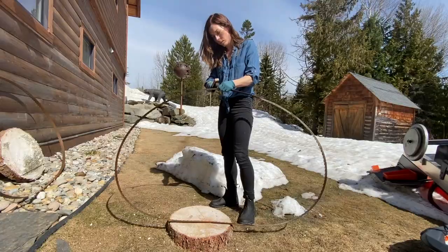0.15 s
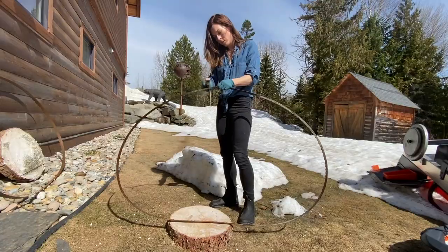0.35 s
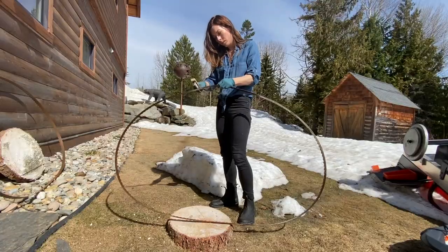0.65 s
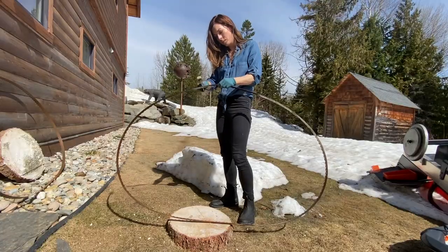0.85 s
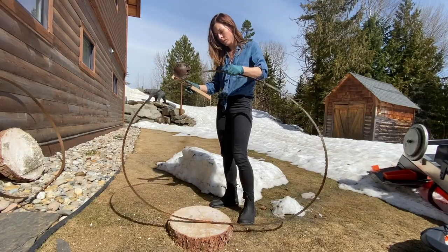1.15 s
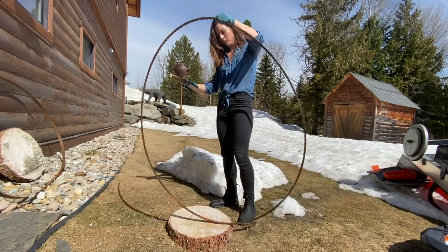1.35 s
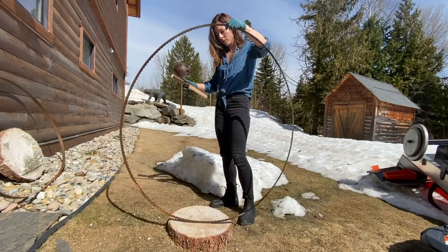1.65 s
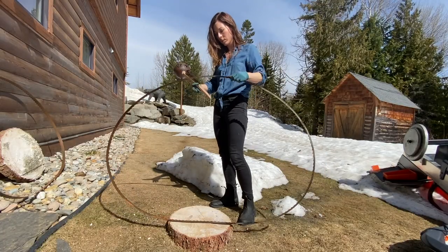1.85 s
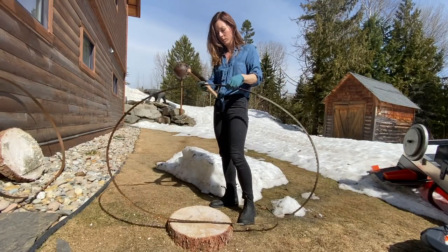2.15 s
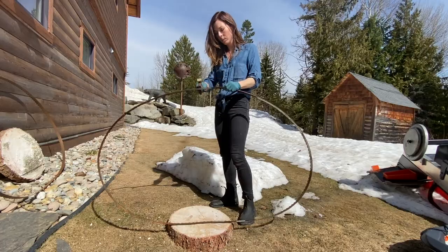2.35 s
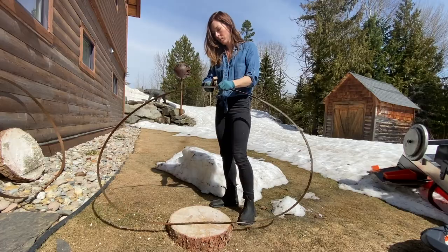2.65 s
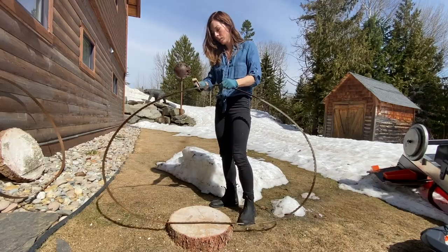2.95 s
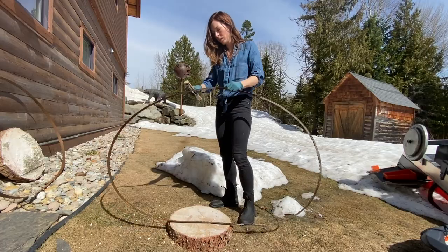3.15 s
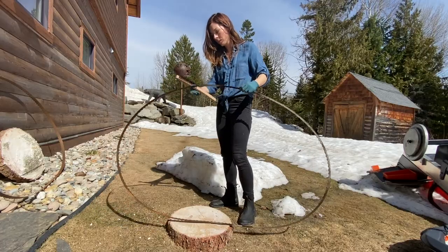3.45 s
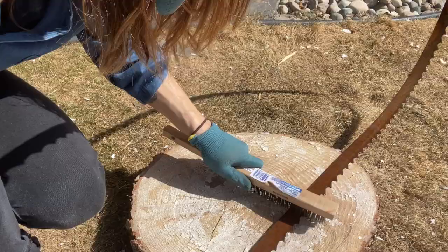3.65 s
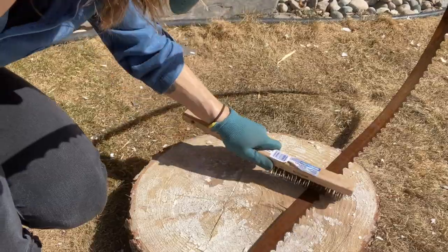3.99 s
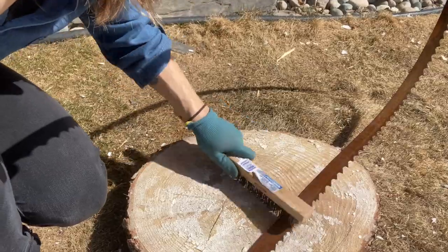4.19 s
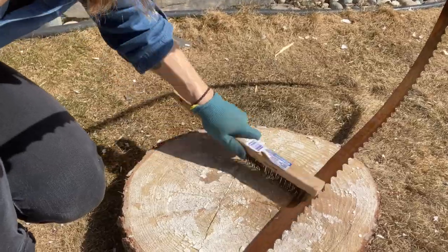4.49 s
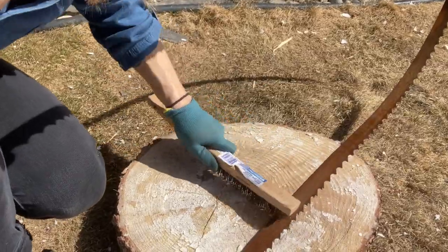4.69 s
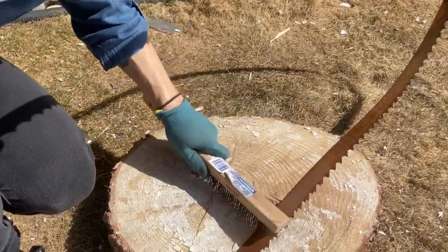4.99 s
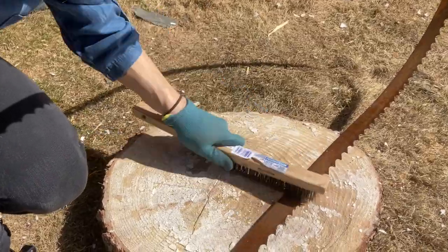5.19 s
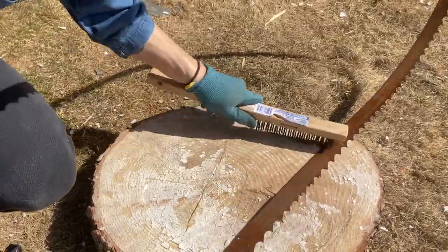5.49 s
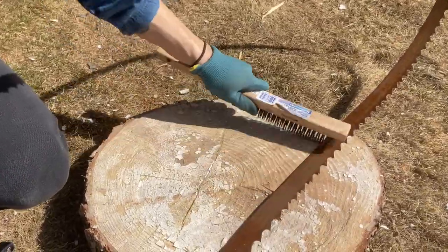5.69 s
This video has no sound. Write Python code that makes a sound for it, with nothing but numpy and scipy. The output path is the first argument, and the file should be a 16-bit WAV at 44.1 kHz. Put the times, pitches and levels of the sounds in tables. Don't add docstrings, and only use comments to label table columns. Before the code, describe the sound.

Outdoors, a wire brush rasps twice along a ringing steel saw band far off, then scrubs rapidly up close over a wooden stump.

```python
import sys
import numpy as np
from scipy import signal
from scipy.fft import rfft, irfft, next_fast_len
from scipy.io import wavfile
from scipy.ndimage import uniform_filter1d

SR = 44100
rng = np.random.default_rng(int(sys.argv[2]) if len(sys.argv) > 2 else 0)


def int16_out(signal):
    q = np.round(np.clip(np.atleast_2d(signal).T, -1, 1) * 32767)
    wavfile.write(sys.argv[1], SR, q.astype(np.int16))


def to_linear_factor(level_db):
    exponent = np.asarray(level_db, float) / 20
    return 10 ** exponent


N = 257103
SIZE = next_fast_len(N + SR)
HZ = np.fft.rfftfreq(SIZE, 1 / SR)
T = np.arange(N) / SR

# start in seconds, peak in dB, low ping in dB.
TOOTH_CATCHES = [(0.084, -41, -86), (0.1534, -52, -64), (0.168, -39.5, -59), (0.193, -42, -58.5),
                 (0.227, -54, -66), (0.248, -56, -81), (.278, -39.5, -70), (0.3034, -43, -66),
                 (0.333, -43, -75), (0.384, -38, -65), (0.41, -39, -68), (0.4614, -39.5, -81),
                 (0.491, -35.5, -55.5), (0.514, -37, -83), (0.547, -33, -67), (0.5965, -28.5, -51),
                 (0.63, -34, -55.5), (0.6545, -31.5, -52), (0.714, -37, -51), (0.741, -33.5, -58),
                 (0.7707, -32.5, -61), (0.7944, -46, -72), (0.826, -34.5, -53.5), (0.858, -32.5, -56),
                 (0.883, -30.5, -53.5), (0.913, -40.5, -58), (0.944, -36, -57), (0.971, -47, -59),
                 (1.01, -32.5, -64), (2.3797, -37.5, -60), (2.391, -38, -59), (2.4505, -38, -54),
                 (2.4764, -43, -64), (2.5025, -34, -47.5), (2.527, -56, -53.5), (2.586, -34.5, -74.5),
                 (2.6163, -38, -57), (2.66, -31, -57), (2.693, -33.5, -76), (2.72, -40, -73),
                 (2.771, -30, -50.5), (2.804, -36.5, -57), (2.836, -55, -72), (2.866, -40, -67),
                 (2.8885, -33, -51), (2.9436, -32, -50), (2.996, -27.5, -55), (3.0594, -53, -83),
                 (3.079, -37, -70), (3.1073, -30, -51), (3.129, -38, -57), (3.15, -49, -67)]
# peak in dB, t60 in seconds, rise in seconds, low ping in dB.
SLAP = (-24, -0.1, 0.5, -50.5)
# frequency in Hz, level in dB, t60 in seconds.
BAND_MODES = [(535, -6.5, 0.021), (965, 5, 0.056), (1023, -1, 0.018), (2472, -3, 0.086), (2864, 3, 0.061),
              (2910, -2, 0.025), (3790, -4, 0.05), (4650, 3, 0.036), (4510, -15, 0.046), (4500, -11, 0.054),
              (6070, 0, 0.036), (6460, 7, 0.038), (6595, 4.5, 0.027), (8600, 3, 0.3), (8880, 10.5, 0.072),
              (9300, -21, 0.26), (10600, -29, 0.2), (11560, 13, 0.056), (11170, 0.5, 0.067),
              (11400, -7.5, 0.26), (14000, -9, .05), (14400, -10, 0.081), (15800, -2, 0.055),
              (15700, -2, 0.11), (15800, -13, 0.11), (16000, 4, 0.17)]
# frequency in Hz, level in dB.
RUST_COLOUR = [(250, -77), (500, 2), (1500, -5), (2600, 1.5), (5000, 4.5), (7200, 1.5), (9300, 6),
               (11000, -1), (11700, 1), (12300, -30), (12800, 5), (14900, 2), (15150, 14.5), (15800, 4.5)]
# frequency in Hz, likeness 0-1, phase in radians, left over right in dB.
FAR_PORTS = [(300, 0.32, 0, -2.5), (1080, 0.99, -1.36, 4.5), (3860, 0.85, -1.5, 0), (6200, 0.48, -2, -1),
             (7440, 0, -4, 2), (8700, 1, -5, 2.5), (11400, 0.2, -4.5, 5), (12800, 0.7, -0.5, 1),
             (15700, 0, -16, 1)]
SLAP_S = 2.3272
TOOTH_T60, TOOTH_RISE_S = 0.07, 0.0085
GRIT_RING_DB, TOOTH_RING_DB = 2.5, 6.0
TICK_DB = -9
SPOT_DB, SPOT_SPREAD = (5, 2), .008
HELD_DB = (-4, 1)


def free_band():
    press, grip = drag_shape()
    press = press * to_linear_factor(2.0 * wander(220))
    grit = patchy(slips(20000, 2.9), 2.7)
    scrape = yard((grit + to_linear_factor(TICK_DB) * slips(500, 3.6)) * press, 0.16, -6.5)

    hits = [(s, db, TOOTH_T60, TOOTH_RISE_S, ping) for s, db, ping in TOOTH_CATCHES]
    s, peak_db, t60, rise, ping_db = np.transpose(hits + [(SLAP_S, *SLAP)])
    knock = patchy(slips(9000, 2.65), 2.5)
    catches = yard(knock * jolts(s, peak_db - 1.0, t60, rise), 0.3, -10.0)
    pings = knock * jolts(s, ping_db + 9, 0.082, 0.01)

    rust = to_linear_factor(read(RUST_COLOUR))
    low = 1 / (1 + (HZ / 1600) ** 4)
    tilt = to_linear_factor(2.33 * np.log2(np.clip(HZ, 2000, None) / 8000))
    out = 0
    spot = np.searchsorted(np.sort(s), T) % 2 + 2 * (T > 2)
    for k, (gain, tune) in enumerate(rng.standard_normal((4, 2, len(BAND_MODES)))):
        drag = k // 2
        gain = np.clip(gain, -1.5, 1)
        rings = modes([(hz * (1 + SPOT_SPREAD * b), db + HELD_DB[drag] + SPOT_DB[drag] * a, ring)
                       for (hz, db, ring), a, b in zip(BAND_MODES, gain, tune)])
        gritty = unit(rust + to_linear_factor(GRIT_RING_DB) * rings) * (1 - low) * tilt
        struck = unit(rust + to_linear_factor(TOOTH_RING_DB) * rings) * (1 - low) / tilt
        out = out + ports(scrape * (spot == k), gritty, FAR_PORTS)
        out = out + ports(catches * (spot == k), struck, FAR_PORTS)

    out = out + ports(pings, unit(modes(BAND_MODES) * low) * to_linear_factor(-5.5), FAR_PORTS)
    body = unit(rust + to_linear_factor(GRIT_RING_DB) * modes(BAND_MODES)) * .5 + unit(rust) * .5
    return out + ports(scrape * grip, body * low * HZ ** 2 / (HZ ** 2 + 250 ** 2), FAR_PORTS)


# start in seconds, end in seconds, scrape in dB,
# grip at the start in dB, grip at the end in dB.
DRAGS = [
    (0.077, 1.041, -48.5, -14, 1.5),
    (2.319, 3.199, -48.5, -3.5, 1),
]
LAND_S, LIFT_S, LIFT_DB = 0.0092, 0.022, -6.5
SETTLE = 0.88
GRIP_WAVER_DB = 1.5


def drag_shape():
    press, grip_db = np.zeros(N), np.zeros(N)
    for start, end, db, first_db, last_db in DRAGS:
        knots = [start, start + LAND_S, end - LIFT_S, end, end + 0.011]
        press += np.interp(T, knots, [0, 1, 1, to_linear_factor(LIFT_DB), 0]) * to_linear_factor(db)
        held = (T > start - .01) * (T < end + .3)
        grip_db += held * np.interp(T, [start, start + SETTLE * (end - start)], [first_db, last_db])
    return press, to_linear_factor(grip_db + 0.5 + GRIP_WAVER_DB * wander(14))


# frequency in Hz, level in dB, t60 in seconds.
SMACK_MODES = [(2844, 5.5, 0.052), (5570, -3, 0.017), (6560, 4.5, 0.038), (7780, -1, 0.02),
               (13300, -2, 0.014)]


def smack():
    crack = rng.standard_normal((2, N)) * jolts([SLAP_S], -33.5, 0.083, 0.00092)
    return ports(crack, unit(modes(SMACK_MODES)), FAR_PORTS)


# start in seconds, peak in dB, brightness in dB an octave, pan in dB.
TAPS = [(1.075, -47, 10, 3), (1.1166, -45.5, -3, -4), (1.2563, -55.5, 4, 12), (1.43, -62, -3, -2),
        (1.513, -62, -5, 1), (1.553, -52, 22, 14), (1.6788, -42, -4, 3.5), (1.704, -58, -10, 8),
        (1.8022, -57, -6, 12), (1.8344, -78, -10, -7), (2.03, -59, -5, -14), (2.108, -61.5, 2, 10),
        (2.1823, -63, -4.5, 8), (2.203, -63, -3, -3), (2.219, -58, -4, -4), (2.047, -65, 9, -2),
        (2.118, -75, 10, 2.5), (1.818, -50, -9, 1), (2.282, -50, -3.5, -6), (2.06, -68, 14, 0),
        (1.5, -68, 8, 3), (3.2194, -61, -5, 8.5), (3.27, -52, -1, -3), (3.3665, -56, 9, 9),
        (3.428, -60, -1.5, 7)]
# frequency in Hz, level in dB, t60 in seconds.
CLINK_MODES = [(920, -13, 0.16), (2750, 5, 0.093), (3930, -21, 0.065), (3730, -5, 0.051), (4870, -9, .08),
               (5960, 0, 0.12), (7900, -6, 0.19), (9100, -2, 0.16), (10000, 0, 0.08), (11450, -18, 0.17),
               (15350, -13, 0.24)]
TAP_T60, TAP_RING_DB = 0.08, -1
HARD_DB, HARD_TAP_T60, HARD_RING_DB = -44.5, 0.24, -10


def taps():
    dull, rung = np.zeros((2, N + SR)), np.zeros((2, N + SR))
    t, hz = np.arange(4096) / SR, np.fft.rfftfreq(4096, 1 / SR)
    octaves = np.log2(np.clip(hz, 500, None) / 6000)
    noise = rng.standard_normal((len(TAPS), 2, 4096))
    for (s, db, tilt_db, pan_db), puff in zip(TAPS, noise):
        t60, ring_db = (HARD_TAP_T60, HARD_RING_DB) if db > HARD_DB else (TAP_T60, TAP_RING_DB)
        puff = evened(irfft(rfft(puff) * to_linear_factor(tilt_db * octaves)))
        puff = puff * to_linear_factor(db - 8.5 - 60 * t / max(t60, .01) + np.array([[pan_db], [-pan_db]]) / 2)
        dull[:, round(s * SR):][:, :4096] += puff
        rung[:, round(s * SR):][:, :4096] += puff * to_linear_factor(ring_db)
    colour = unit(to_linear_factor(read(RUST_COLOUR)) + to_linear_factor(2.5) * modes(BAND_MODES))
    rustle = ports(dull[:, :N], colour, FAR_PORTS)
    return rustle + ports(rung[:, :N], to_linear_factor(12.5) * modes(CLINK_MODES), FAR_PORTS)


# start in seconds, level in dB, pitch in Hz, sag in Hz a second.
TWANGS = [
    (1.674, -44, 971, 299),
    (1.708, -62, 3940, 3000),
    (1.718, -66, 6230, 1500),
    (1.802, -80, 6400, 0),
    (1.808, -76, 3760, 1500),
    (1.812, -76, 4260, -2500),
]
TWANG_RISE_S, TWANG_T60 = 0.011, 0.13


def twangs():
    out, t = np.zeros(N), np.arange(SR // 5) / SR
    for s, db, hz, sag in TWANGS:
        ring = np.sin(2 * np.pi * (hz - sag * t / 2) * t) * np.minimum(t / TWANG_RISE_S, 1)
        out[round(s * SR):][:len(t)] += ring * to_linear_factor(db - 60 * t / TWANG_T60)
    return out * to_linear_factor(2.5 * wander(120) + np.array([[2.5], [-2.5]]))


# turn in seconds, level at the turn in dB, rise in seconds,
# level after the rise in dB, stump in dB.
STROKES = [(3.678, -73, 0.013, -40, -23), (3.835, -50.5, 0.067, -33.5, -28.5),
           (3.997, -51, 0.032, -42, -14), (4.161, -44.5, 0.1, -34, -28), (4.338, -46.5, 0.015, -42, -15.5),
           (4.484, -43, 0.086, -37.5, -26), (4.607, -44.5, 0.11, -36, -18), (4.751, -42.5, 0.074, -38, -22),
           (4.869, -52.5, 0.059, -35, -11.5), (5.015, -44, 0.059, -39, -16),
           (5.162, -52.5, 0.036, -36, -10.5), (5.324, -47, 0.073, -36, -21.5),
           (5.503, -48.5, 0.02, -43.5, -22), (5.651, -48, 0.019, -40.5, -18),
           (5.777, -45, 0.011, -46, -20.5)]
# level when the hand starts to slow in dB, seconds before the next turn.
STROKE_ENDS = [(-41.5, 0.058), (-38, 0.035), (-38, 0.066), (-40.5, 0.032), (-38.5, 0.043), (-37.5, 0.051),
               (-36, 0.038), (-40, .04), (-38.5, 0.026), (-43.5, 0.032), (-37.5, 0.05), (-42, 0.024),
               (-39, 0.026), (-40, 0.039), (-37.5, 0.029)]
# start in seconds, peak in dB, stump in dB.
BITES = [(3.6878, -36, -36), (3.753, -33.5, -10), (3.8645, -23, -11), (4.03, -29, -3.5), (4.0495, -29, -29),
         (3.89, -41, -16), (4.106, -35.5, 4), (4.404, -32, -9), (4.627, -32, -8), (4.715, -33, -2.5),
         (4.94, -43, -10), (5.085, -20, -26), (5.235, -45, -5), (5.275, -39.5, 3.5), (5.461, -31, -10),
         (5.73, -35, -18), (4.1867, -34, -9), (4.214, -16.5, -24), (4.3566, -39.5, 1),
         (4.5024, -24.5, -5.5), (4.763, -21.5, -10), (4.8841, -66, -37), (4.9, -12.5, -16),
         (5.023, -26.5, -12), (5.1859, -36, -15), (5.1974, -40, -17), (5.349, -30, -6), (5.517, -34, 0.5),
         (5.57, -28.5, -10), (5.6595, -22, -7)]
# frequency in Hz, level in dB.
WIRE_COLOUR = [(1200, -68), (2700, -20), (4400, -3), (6200, -7), (8400, 1.5), (10300, -4), (12500, 0.5),
               (14000, 0.5), (14600, -7.5), (15800, -4)]
# frequency in Hz, level in dB, t60 in seconds.
TIP_MODES = [(3270, 6.5, 0.085), (4440, 2.5, 0.21), (5800, 4, 0.09), (7240, -9, 0.24), (7570, -14, 0.35),
             (7500, -18, 0.13), (7800, 6, 0.14), (8270, 8, 0.19), (8900, 2.5, 0.073), (10500, 4, 0.14),
             (11000, -26, 0.15), (12270, 4.5, 0.054), (12900, -17, 0.069), (12500, 12, 0.07),
             (13640, 11.5, 0.034), (14300, 14, 0.049), (13040, 4, 0.08)]
# frequency in Hz, level in dB, t60 in seconds.
STUMP_MODES = [(55, -1, 0.48), (252.7, 4.5, 0.13), (468, -2.5, 0.1), (494, 3, 0.089), (596, 0, 0.046),
               (1140, -6, 0.0039), (1445, -2.5, 0.032), (1657, 6, 0.21), (2340, -14, 0.045),
               (2762, 7.5, 0.089)]
# frequency in Hz, level in dB.
STUMP_COLOUR = [(30, -36), (60, -12), (400, -7.5), (700, -11.5), (1500, -4.5), (3000, -4), (6000, -12.5)]
# frequency in Hz, likeness 0-1, phase in radians, left over right in dB.
NEAR_PORTS = [(60, .7, 0, 0), (250, .96, -.1, 0), (1000, .8, -.3, 2), (1700, .4, -1, 2),
              (3100, .25, -.4, 3), (5400, .35, .2, 2), (6800, .93, 0, 0), (10300, .93, .1, 0),
              (11400, .78, 1.1, 0), (13600, .88, 2.4, 0), (14400, .94, 3.05, 0)]
LAST_TURN_S = 5.86
DWELL_S = 0.0124
TIP_SPREAD = .02
PULL_DB, PULL_HZ = -1, 4400
SING_S, SING_HZ, SING_T60, SING_DB = 4.8, 3750, 0.35, -30


def strokes():
    turn, turn_db, rise, top_db, stump_db = np.transpose(STROKES)
    late_db, ease = np.transpose(STROKE_ENDS)
    next_turn = np.append(turn[1:], LAST_TURN_S)
    late = np.maximum(next_turn - ease, turn + rise + 0.0022)
    after = next_turn - DWELL_S
    leave = turn + DWELL_S * (turn > turn[0])
    risen = turn + np.maximum(rise, DWELL_S + 0.0036)
    knots = np.ravel([leave, risen, np.minimum(late, after - .003), after], "F")
    levels = to_linear_factor(np.ravel([turn_db, top_db, late_db, np.append(turn_db[1:], -46)], "F"))
    press = np.interp(T, knots, levels, left=0) * to_linear_factor(0.68 * wander(59))

    s, peak_db, thump_db = np.transpose(BITES)
    grit = patchy(slips(22000, 2.0), 2.06) + to_linear_factor(TICK_DB - 2.5) * slips(700, 3.5)
    hiss = grit * np.hypot(press, jolts(s, peak_db - 21.5, 0.57, 0.005))
    weight = to_linear_factor(np.interp(T, turn + rise, stump_db) + 1.7 * wander(45))
    weight = weight * press * (press / to_linear_factor(-36.5)) ** 0.38
    push = grit * np.hypot(weight, jolts(s, peak_db - 13.0 + thump_db - 3.0, 0.14, 0.0045))

    which, out = np.searchsorted(turn, T) % 4, 0
    flat = np.exp(-np.log(HZ / PULL_HZ + 1e-9) ** 2 / 0.046)
    for k, tune in enumerate(1 + TIP_SPREAD * rng.standard_normal((4, len(TIP_MODES)))):
        tips = [(hz * shift, db, t60) for (hz, db, t60), shift in zip(TIP_MODES, tune)]
        wires = unit(to_linear_factor(read(WIRE_COLOUR)) * (1 + to_linear_factor(3.5) * modes(tips)))
        wires = wires * to_linear_factor(-0.5 + PULL_DB * (1 - k % 2) * flat)
        out = out + ports(hiss * (which == k), wires, NEAR_PORTS)

    span = unit(modes([(SING_HZ, 0, SING_T60)])) * to_linear_factor(SING_DB)
    span_drive = grit * (.5 * press + to_linear_factor(-39.5)) * (T > SING_S)
    out = out + ports(span_drive, span, [(100, 0.76, 0, 1), (9000, 0.5, 0, 1)])
    wood = to_linear_factor(read(STUMP_COLOUR)) + to_linear_factor(-3.5) * modes(STUMP_MODES)
    wood /= np.sqrt(np.mean(abs(wood) ** 2 * (HZ < 2500)))
    return out + ports(push, wood, NEAR_PORTS)


def pushes():
    turn, *_, stump_db = np.transpose(STROKES)
    phase = np.interp(T, np.append(turn, N / SR), np.arange(len(turn) + 1))
    stroke = np.minimum(phase.astype(int), len(turn) - 1)
    return to_linear_factor(stump_db[stroke]) * np.sin(np.pi * phase) ** 2


# start in seconds, length in seconds, level in dB,
# pitch in Hz, sag in Hz a second.
GROANS = [(3.966, 0.11, -63.5, 52, 0), (4.091, 0.067, -55.5, 275, 300), (4.09, 0.045, -52.5, 457, -2),
          (4.303, 0.053, -60.5, 72, 200), (4.904, 0.045, -56, 255, 594), (4.95, 0.061, -62, 485, 300),
          (5.235, 0.062, -48.5, 508, 800), (5.26, 0.027, -57, 292, 3), (5.339, 0.042, -62, 261, 0),
          (5.46, 0.039, -58, 234, 0), (5.569, 0.033, -62, 595, 0)]


def groans():
    out = np.zeros(N)
    for s, length, db, hz, sag in GROANS:
        t = np.arange(0, length, 1 / SR)
        tone = np.sin(2 * np.pi * (hz - sag * t / 2) * t)
        out[round(s * SR):][:len(t)] += to_linear_factor(db) * np.sin(np.pi * t / length) * tone
    return out * to_linear_factor(2.8 * wander(90) + np.array([[.7], [-.7]]))


# peak time in seconds, buffet in dB, rumble in dB, seconds to fall 20 dB.
GUSTS = [(0.06, -66, -58, -0.22), (0.19, -82, -79, 1.1), (0.91, -51, -53.5, 0.09), (0.945, -55, -62, 0.15),
         (1.56, -54, -68, 0.36), (1.689, -50.5, -70, 0.08), (1.88, -70, -74, -2), (1.98, -76, -69, 2.5),
         (2.27, -49, -65.5, 0.04), (2.37, -64, -49, -0.1), (2.55, -60.5, -62, 1), (2.75, -68, -70, -0.5),
         (2.97, -78, -60, 0), (3.149, -38, -52.5, 0.17), (3.225, -40, -47.5, 0.06), (3.3, -53, -58, -0.05),
         (3.39, -43.5, -56, 0.03), (3.52, -62, -72.5, 0.3), (3.671, -51, -58, -0.77), (4.06, -70, -77, 0.2),
         (4.33, -79, -67, 0.27)]
# time in seconds, level in dB.
BREEZE = [(0, 3.5), (.09, 1), (.13, -7), (.65, -12), (.8, 3), (1.1, 0), (1.35, -1), (1.7, 6), (2.3, -1),
          (3.2, 2), (3.66, -1.5), (3.72, -6.5), (5.83, -2)]
# frequency in Hz, level in dB.
BUFFET_COLOUR = [(25, -35), (50, -22), (100, 7.5), (160, -4), (260, -16.5), (500, -52), (1500, -87)]
# frequency in Hz, level in dB.
RUMBLE_COLOUR = [(22, -45), (45, -17.5), (100, 2.5), (200, 2), (300, -11.5), (500, -20.5), (1500, -67)]
CALM_BUFFET_DB, CALM_RUMBLE_DB = -86, -72
GUST_RISE = 0.42
HAND_DB = -59


def wind():
    breeze_db = np.interp(T, *np.transpose(BREEZE))
    power = to_linear_factor(breeze_db + np.array([[CALM_BUFFET_DB], [CALM_RUMBLE_DB]])) ** 2
    for s, buffet_db, rumble_db, fall in GUSTS:
        age = np.maximum(T - s, (s - T) / GUST_RISE) / max(fall, .02)
        power = power + to_linear_factor(np.array([[buffet_db], [rumble_db]]) - 20 * age) ** 2
    buffet, ground = np.sqrt(power)
    gusts = rng.standard_normal((2, N)) * buffet * to_linear_factor(2.0 * wander(30))
    ground = np.hypot(ground, to_linear_factor(HAND_DB) * pushes())
    rumble = rng.standard_normal((2, N)) * ground * to_linear_factor(-1.0 + 2.4 * wander(34))
    opposed = [(40, 0.8, np.pi, 0.81), (205, 0.91, np.pi, 2.4)]
    alike = [(40, 1.0, 0, 0.39), (304, 0.81, 0.026, 0)]
    return (ports(gusts, unit(to_linear_factor(read(BUFFET_COLOUR))), opposed)
            + ports(rumble, unit(to_linear_factor(read(RUMBLE_COLOUR))), alike))


# frequency in Hz, level in dB.
WASH_COLOUR = [(100, -49), (220, -5.5), (300, -8.5), (733, -13.5), (1300, -8.5), (1720, -9), (2400, -18.5),
               (3140, -25.5), (6000, -34), (12100, -40), (16000, -37)]
# frequency in Hz, likeness 0-1, phase in radians, left over right in dB.
WASH_PORTS = [(198, 0.65, -1.5, -6), (453, 0.6, 0.5, 1), (960, 0.5, 2, 0), (2470, 0, 2.5, 2),
              (5070, 0.5, -8.5, 3.5), (10100, 0.2, 18, 9)]
WASH_DB, WASH_FOLLOWS = -67, 0.47


def wash():
    breeze_db = np.interp(T, *np.transpose(BREEZE))
    level = to_linear_factor(WASH_DB + WASH_FOLLOWS * breeze_db + 1.47 * wander(39))
    return ports(rng.standard_normal((2, N)) * level, unit(to_linear_factor(read(WASH_COLOUR))), WASH_PORTS)


def slips(per_s, spread_db):
    chance, size, sign = rng.random((3, 2, N))
    size = to_linear_factor(spread_db * np.minimum(-np.log(size + 1e-9), 5))
    return evened((chance < per_s / SR) * size * np.sign(sign - .5))


def patchy(x, depth_db):
    z = signal.stft(x, nperseg=256)[2]
    patches = rng.standard_normal(z.shape[:0:-1])
    patches = uniform_filter1d(uniform_filter1d(patches, 8, 0), 6, 1)
    return evened(signal.istft(z * to_linear_factor(depth_db * evened(patches).T), nperseg=256)[1][:, :N])


def jolts(times, peak_db, t60, rise):
    out = np.zeros(N)
    for s, db, ring, up in np.transpose(np.broadcast_arrays(times, peak_db, t60, rise)):
        age = np.maximum(T[int(s * SR):][:SR // 4] - s, 0)
        fade = to_linear_factor(db - 60 * age / max(ring, .01))
        out[int(s * SR):][:SR // 4] += fade * np.minimum(age / max(up, .0005), 1)
    return out


def wander(per_s):
    width = int(SR / per_s)
    return evened(uniform_filter1d(uniform_filter1d(rng.standard_normal(N), width), width))


def modes(rows):
    return sum(to_linear_factor(db) / (1 + 1j * (HZ - hz) * 2 * np.pi * t60 / np.log(1000)) for hz, db, t60 in rows)


def read(points, axis=1):
    columns = np.transpose(points)
    return np.interp(np.log(HZ + 1), np.log(columns[0]), columns[axis])


def unit(response):
    return response / np.sqrt(np.mean(abs(response) ** 2))


def evened(x):
    return x / np.sqrt(np.mean(x ** 2) + 1e-20)


def ports(drive, response, table):
    a, b = rfft(drive, SIZE) * response
    same, half_db = np.clip(read(table), 0, 1), read(table, axis=3) / 2
    right = same * a * np.exp(-1j * read(table, axis=2)) + np.sqrt(1 - same ** 2) * b
    return irfft(np.array([a * to_linear_factor(half_db), right * to_linear_factor(-half_db)]), SIZE)[:, :N]


def yard(x, t60, level_db):
    t = np.arange(SR // 3) / SR
    tail = rng.standard_normal((2, len(t))) * to_linear_factor(-60 * t / t60) * (t > .006)
    return x + to_linear_factor(level_db) * signal.fftconvolve(x, tail / np.linalg.norm(tail[0]), axes=1)[:, :N]


def scene():
    far = free_band() + smack() + taps() + twangs()
    near = strokes() + groans()
    return far + near + wind() + wash()


def top_cut(x):
    return signal.sosfilt(signal.butter(12, 17150, fs=SR, output="sos"), x)


def record(dry):
    return top_cut(dry)


dry = scene()
out = record(dry)
int16_out(out)
```